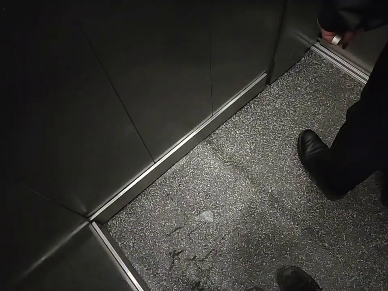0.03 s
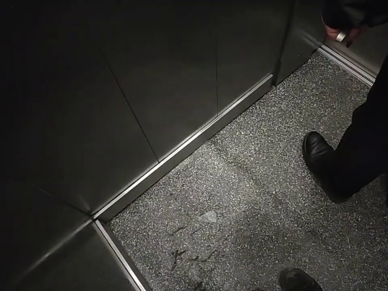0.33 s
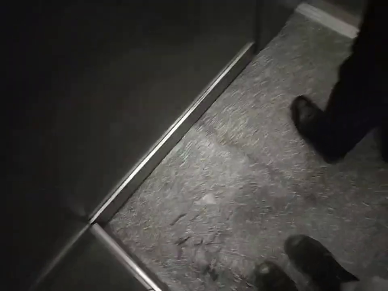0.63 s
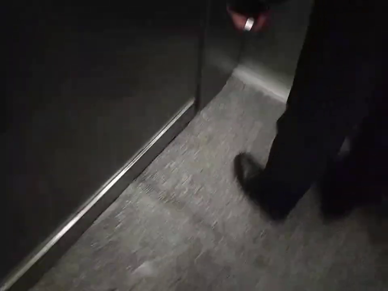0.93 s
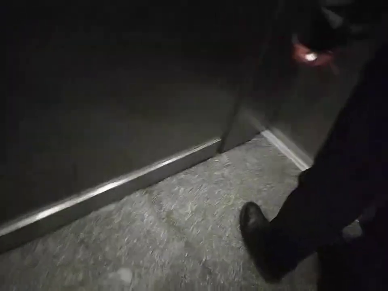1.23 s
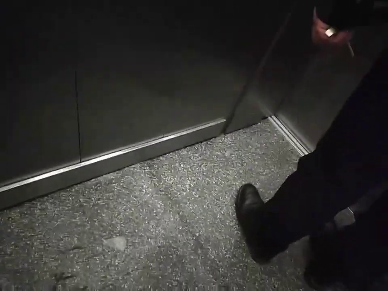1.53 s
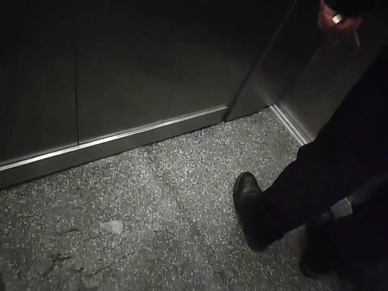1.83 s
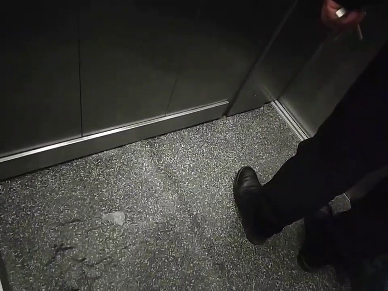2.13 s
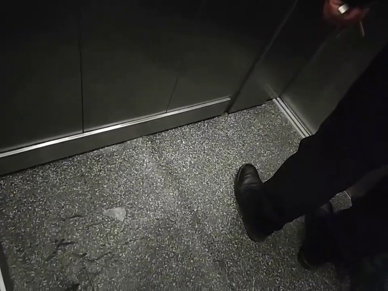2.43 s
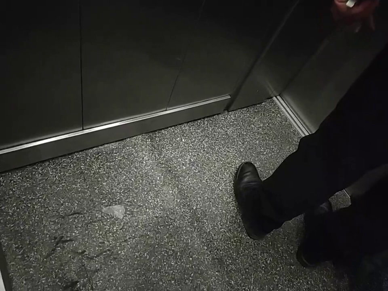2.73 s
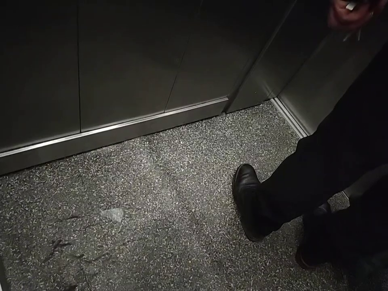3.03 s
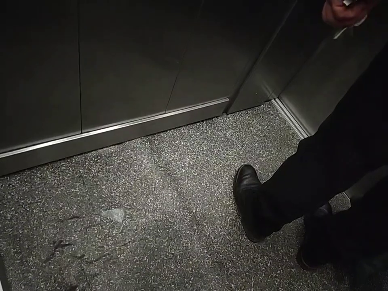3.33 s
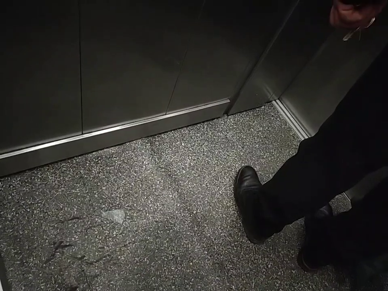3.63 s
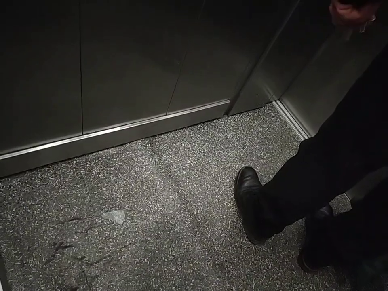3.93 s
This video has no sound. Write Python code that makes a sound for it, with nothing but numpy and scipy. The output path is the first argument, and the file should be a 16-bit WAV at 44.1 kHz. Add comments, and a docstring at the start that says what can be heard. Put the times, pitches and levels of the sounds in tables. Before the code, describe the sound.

Shoes shuffle and thud in a metal elevator, with a latch clack and clicking keys.

```python
"""Shuffling in a metal lift cabin

Shoes thud and scuff on the hollow floor, and each blow excites the cabin's modes into a boom.
Friction gives gritty scrapes and the rustle of clothes. A latch clacks and a metal fitting,
knocked twice, rings in damped free vibration. Keys click in a hand over a low rumble and faint hiss."""
import sys
import numpy as np
from scipy import signal
from scipy.fft import rfft, irfft
from scipy.io import wavfile
from scipy.ndimage import map_coordinates

SR = 44100
rng = np.random.default_rng(int(sys.argv[2]) if len(sys.argv) > 2 else 0)


def to_wav(sig):
    """Store sig (one row per channel, or 1-D mono) as 16-bit WAV at the path in sys.argv[1].

    Samples outside -1..1 are clipped; the rate is SR.
    """
    pcm = np.clip(np.atleast_2d(sig), -1, 1) * 32767
    pcm = np.round(pcm).astype(np.int16)
    wavfile.write(sys.argv[1], SR, pcm.T)  # frames by channels


N = 176400
T = np.arange(N) / SR
LN_1000 = np.log(1000)  # amplitude falls a thousandfold, or 60 dB, in one t60

# Course of the rumble and of the rustle. Each row: time in seconds, level in dB.
RUMBLE_LEVELS = [(0, -44), (.35, -45.5), (.85, -45.5), (1.2, -53.5), (1.6, -48), (2.0, -51), (2.5, -51),
                 (3.1, -59), (3.5, -58.5), (4, -61)]
RUSTLE_LEVELS = [(0, -59), (.09, -51), (.19, -45.5), (.28, -51), (.38, -49.5), (.58, -53), (.75, -51.5),
                 (.95, -55.5), (1.18, -56), (1.55, -60.5), (1.92, -60.5), (2.22, -73), (2.5, -65),
                 (2.66, -75), (2.77, -67), (2.92, -73.5), (3.03, -66), (3.35, -74), (3.48, -65),
                 (3.76, -73.5), (4, -66.5)]
# Footfalls. Each row: start and rise in seconds, relative levels of cabin boom, floor knock and
# sole scuff in dB, frequency favoured by that spot of the floor in Hz.
STEPS = [(0.0, 0.0026, -47, -40.5, -48.5, 325), (0.041, 0.038, -41.5, -58, -54, 170),
         (0.156, 0.016, -49, -38.5, -45, 476), (0.184, 0.0059, -30, -35.5, -64, 189),
         (0.316, .014, -39.5, -70, -75, 160), (.469, 0.016, -68, -46.5, -55, 240),
         (0.537, 0.0063, -55, -42.5, -60, 320), (0.596, 0.024, -40, -50, -55, 158),
         (0.636, .0035, -38.5, -37, -51, 300), (.735, .015, -38, -45.5, -54.5, 163),
         (0.804, 0.0049, -37, -40, -49, 166), (0.851, .008, -34.5, -58, -75, 278.6),
         (1.224, 0.073, -46.5, -47, -57, 229), (1.333, 0.024, -48, -45, -68, 240),
         (1.422, 0.024, -38.5, -47, -55.5, 238), (1.455, 0.006, -39, -44.5, -53, 175),
         (1.525, 0.014, -34, -39.5, -47.5, 415), (1.563, .006, -42, -40.5, -46, 460),
         (1.598, 0.0092, -36, -38.5, -63, 246), (1.669, .003, -35, -44.5, -43.5, 550),
         (1.801, 0.06, -38.5, -44.5, -56, 244), (1.889, 0.032, -37, -42.5, -52.5, 215),
         (2.296, 0.0098, -40.5, -42.5, -52.5, 252), (2.368, .012, -41, -43.5, -54, 380),
         (3.421, 0.072, -53, -58.5, -92, 161), (3.56, 0.066, -51, -59.5, -95, 145.5)]
# Modes of the cabin and its wall panels. Each row: frequency in Hz, gain in dB, t60 in seconds.
CABIN_MODES = [(101, -24.5, 1.7), (144.4, -22, 1.7), (166.1, -10, 0.83), (205.3, -16, .25),
               (237, -16, 0.84), (323.7, -18.5, 0.83), (409.4, -19.5, 0.28), (561, -29, 1.15),
               (1688, -40.5, 1.7)]
# Key contacts. Each row: start and rise in seconds, relative level and pan in dB, resonance in Hz.
KEY_CLICKS = [(0.609, 0.0012, -50, -13, 8540), (2.766, 0.00065, -51, -5, 11200),
              (3.018, 0.00031, -52.5, -4, 9800), (3.2683, 0.00049, -40, -3, 10940),
              (3.287, 0.0016, -39, -6, 11240), (3.3485, 0.00066, -46.5, -2, 11600),
              (3.419, 0.0026, -53.5, -6, 9400), (3.641, 0.032, -53.5, -4, 8660),
              (3.884, 0.00087, -44, -3, 8250), (3.919, 0.00084, -36.5, -5, 8200),
              (3.929, 0.0093, -42, 1, 9300)]
# Scrapes. Each row: start, rise and t60 in seconds, then hiss level, body level, hiss pan and
# lift of the sheen above about 12 kHz, all in dB.
SCRAPES = [(0.783, 0.012, .19, -34, -50.5, -5.5, -2), (.845, 0.017, 0.14, -39, -51, -13, 17),
           (1.213, .03, 0.33, -55.5, -53, -10.5, -4), (1.331, 0.011, 0.25, -48, -55, 15, 6),
           (1.383, .035, 0.31, -45.5, -60, -3.5, 10), (1.662, 0.013, 0.23, -40, -44.5, -2, -14),
           (2.36, 0.0083, 0.24, -53.5, -50.5, -15, -17)]
# Modes of the door latch. Each row: frequency in Hz, level in dB.
LATCH_MODES = [(590, -33), (1350, -37), (2020, -40), (3120, -48), (3640, -46), (4980, -44.5), (6850, -38)]
# Knocks on the fitting. Each row: start and rise in seconds, relative level and pan in dB.
FITTING_KNOCKS = [(1.664, .008, -39, -10.5), (2.364, 0.019, -49, -7)]
# Its modes. Each row: frequency in Hz, t60 in seconds, gains at the first and second knock in dB.
FITTING_MODES = [(4050, 0.26, -14, -13), (4400, 0.24, -11, -17), (4850, 0.15, -7, 5.5),
                 (5900, 0.76, -20, -21), (6854, 0.37, 3.5, -3.5), (7400, 0.17, -1, -8),
                 (8060, 0.21, 1, 1.5), (8444, .12, 14.5, -5), (9076, 0.11, 4, -13), (9570, 0.16, 1.5, -14),
                 (10300, .2, -7, -15), (10780, 0.16, -7, -18), (12300, 0.14, -15, -24)]
# Dry ticks. Each row: start in seconds, level in dB.
TICKS = [(2.122, -53), (2.853, -56.5)]
# Spectra of the noises. Each row: frequency in Hz, relative spectral density in dB.
RUMBLE_SPECTRUM = [(15, -18), (28, -8), (39, 5), (50, -3.5), (70, -3.5), (102, -8.5), (140, -16.5),
                   (300, -28), (1000, -77)]
AIR_SPECTRUM = [(71, -40), (120, 5.5), (323, 3), (514, -8.5), (1560, -18.5), (2340, -20.5), (6690, -31),
                (10000, -37), (15000, -54)]
FLOOR_SPECTRUM = [(90, -10.5), (170, 7.5), (215, 2.5), (272, 0), (325, 1.5), (378, -5), (480, -8),
                  (545, -8.5), (680, -15.5), (850, -20.5), (2000, -65)]
SCUFF_SPECTRUM = [(250, -3), (520, 3.5), (850, 6), (1100, -1), (1520, -6.5), (1690, -8.5), (1850, -10),
                  (2050, -7.5), (3200, -18.5), (6000, -29), (15000, -82)]
CLOTH_SPECTRUM = [(300, 7), (800, 2), (1500, -1.5), (3500, -4.5), (5300, -4), (7000, -1.5), (8700, 4.5),
                  (10200, 5.5), (12000, -6), (15500, -19)]
KEY_SPECTRUM = [(1000, -19.5), (3000, -17.5), (4500, -9.5), (6000, -0.5), (6700, -7.5), (8200, 0),
                (10000, 1.5), (11200, 1), (12200, -7.5), (15500, -14)]
SCRAPE_BODY_SPECTRUM = [(300, -43), (580, -8), (1250, -0.5), (1520, -7.5), (1620, -4), (1690, 9.5),
                        (1780, -4.5), (2120, -2), (2400, -5), (2720, 0), (2880, -6.5), (3500, -13.5),
                        (5000, -13), (9000, -80)]
SCRAPE_HISS_SPECTRUM = [(2000, -6), (4000, -6.5), (5400, -5.5), (6600, 4.5), (8000, 3.5), (9700, 5.5),
                        (10700, 0.5)]
SCRAPE_SHEEN_SPECTRUM = [(11800, -15), (15500, -30)]
TICK_SPECTRUM = [(300, 14), (1000, 15), (3000, -4), (5000, 3), (8000, -1), (15000, -15)]


def amp(db):
    """Amplitude ratio of a level in decibels."""
    return 10 ** (np.asarray(db) / 20)


def unit_rms(x):
    """Normalisation to unit mean power."""
    return x / np.sqrt(np.mean(x ** 2))


def pan(db):
    """Constant-power gains for a level difference, left minus right."""
    return unit_rms(amp(np.array([[db], [-db]]) / 2))


def noise(spectrum, coherence=0., grain_db=0., scatter_db=0., ring_hz=0.):
    """Coloured stereo noise, coherent only in the bass: higher up, each side hears other reflections."""
    grain = amp(grain_db * np.repeat(rng.standard_normal(N // 30 + 1), 30)[:N])
    white = rng.standard_normal((3, N)) * grain
    f = np.fft.rfftfreq(N, 1 / SR) + 1
    shared = coherence / (1 + (f / 644) ** 4)
    mixed = np.sqrt(shared) * rfft(white[2]) + np.sqrt(1 - shared) * rfft(white[:2])
    hz, db = np.array(spectrum, float).T
    chance_resonances = np.interp(f, 109 * np.arange(512), rng.standard_normal(512))
    shape_db = np.interp(np.log(f), np.log(hz), db) + scatter_db * chance_resonances
    if ring_hz:
        shape_db += 10.5 / (1 + ((f - ring_hz) / 287) ** 2)  # one definite resonance
    low_cut = 1 / np.sqrt(1 + (.5 * hz[0] / f) ** 4)
    return unit_rms(irfft(mixed * amp(shape_db) * low_cut, N))


def swell(start, rise, t60):
    """Envelope of a damped response: linear rise, exponential decay."""
    age = T - start
    return np.clip(age / rise, 0, 1) * np.exp(-LN_1000 * np.maximum(age - rise, 0) / t60)


def ring(start, rise, modes, chatter_t60=0.092, contacts_per_s=400):
    """Struck modes are modulated at random while the parts chatter, then decay freely."""
    age = T - start
    live = (age > 0) & (age < 1)
    out, t = np.zeros((2, N)), age[live]
    roughness = 5.4 * np.exp(-LN_1000 * t / chatter_t60)
    for hz, db, t60 in modes:
        contacts = rng.standard_normal((2, 1024)) + 1j * rng.standard_normal((2, 1024))
        chatter = np.array([np.interp(t * contacts_per_s, np.arange(1024), c) for c in contacts])
        tone = np.exp((2j * np.pi * hz - LN_1000 / t60) * t)
        rough_tone = np.imag(tone * (1 + roughness * chatter / np.sqrt(2)))
        out[:, live] += amp(db) * rough_tone / np.hypot(1, roughness)
    return out * np.clip(age / rise, 0, 1)


def walls(x, wet_db, t60):
    """Reverberation: dense reflections between close metal walls follow the direct sound."""
    t = T[:SR // 2]
    tail = rng.standard_normal((2, len(t))) * np.exp(-LN_1000 * t / t60) * (t > .003)
    tail /= np.sqrt(np.sum(tail ** 2, axis=1, keepdims=True))
    return x + amp(wet_db) * signal.fftconvolve(x, tail, axes=1)[:, :N]


def background():
    """Ambient noise: the cabin's low rumble varies in level under the steady hiss of the air."""
    level_db = np.interp(T, *np.array(RUMBLE_LEVELS).T)
    rumble = amp(level_db) * noise(RUMBLE_SPECTRUM, coherence=0.97) * pan(4.7)
    return rumble + amp(-66) * noise(AIR_SPECTRUM, coherence=0.69) * pan(8.2)


def cabin_boom(push_s=0.0056, favour_db=14, favour_octaves=.29, wander_hz=4.07):
    """Modal excitation: each mode stores energy from a footfall according to where the shoe lands."""
    boom = 0
    for hz, mode_db, t60 in CABIN_MODES:
        power = np.zeros(N)
        for start, _, blow_db, _, _, favoured_hz in STEPS:
            lift_db = favour_db * np.exp(-(np.log2(hz / favoured_hz) / favour_octaves) ** 2)
            power[int(start * SR):int((start + push_s) * SR)] += amp(blow_db + lift_db) ** 2
        energy = signal.lfilter([1], [1, -np.exp(-2 * LN_1000 / (t60 * SR))], power / (push_s * SR))
        # A random drift stands for the wavering pitch of overlapping blows.
        drift = wander_hz * np.interp(T, np.linspace(0, 4, 60), rng.standard_normal(60))
        phase = 2 * np.pi * np.cumsum(hz + drift) / SR
        boom += amp(mode_db) * np.sqrt(energy) * np.sin(phase)
    return boom * pan(4.5)


def floor_knocks():
    """Impact gives the floor panel a quick thump and a slower decay; successive blows add in energy."""
    energy = 0
    for start, rise, _, db, _, _ in STEPS:
        thump = amp(-4.5) * swell(start, rise, t60=0.27)
        energy += (amp(db) * (thump + swell(start, rise, t60=0.82))) ** 2
    return amp(-3) * np.sqrt(energy) * noise(FLOOR_SPECTRUM, coherence=0.81) * pan(3.5)


def sole_scuffs():
    """Sliding friction between sole and floor gives a burst of grainy noise at each step."""
    energy = sum((amp(db) * swell(start, rise, t60=0.29)) ** 2 for start, rise, _, _, db, _ in STEPS)
    friction = noise(SCUFF_SPECTRUM, coherence=0.078, grain_db=4.5, scatter_db=2.5)
    return amp(2.5) * walls(np.sqrt(energy) * friction, wet_db=-6, t60=0.4) * pan(6)


def cloth_rustle(slips_per_s=44, flutter_db=0.47, patch_db=3.5, patch_hz=494):
    """Stick-slip friction of fabric: every slip has a level and a colour of its own."""
    flutter = flutter_db * np.interp(T * slips_per_s, np.arange(256), rng.standard_normal(256))
    friction = noise(CLOTH_SPECTRUM, coherence=0.052, grain_db=2.5)
    f, t, bands = signal.stft(friction, SR, nperseg=256)
    grid = np.meshgrid(f / patch_hz, t * slips_per_s, indexing="ij")
    patches = map_coordinates(rng.standard_normal((128, 256)), grid, order=1, mode="mirror")
    rub = signal.istft(bands * amp(patch_db * patches), SR)[1][:, :N]
    level_db = np.interp(T, *np.array(RUSTLE_LEVELS).T)
    return amp(level_db + flutter) * unit_rms(rub)


def cloth_crackle(catches_per_s=19, t60=0.022):
    """Fabric catches and lets go as a Poisson process, each release a tiny bright tick."""
    catches = (rng.random(N) < catches_per_s / SR) * rng.random(N)
    envelope = signal.lfilter([1], [1, -np.exp(-LN_1000 / (t60 * SR))], catches)
    return amp(-63) * envelope * noise(CLOTH_SPECTRUM)


def keys():
    """Each impact of key on key gives a sharp snap and excites resonances of its own."""
    clicks = 0
    for start, rise, db, pan_db, hz in KEY_CLICKS:
        snap = amp(-2) * swell(start, rise, t60=0.0076)
        envelope = snap + swell(start, rise, t60=0.14)
        metal = noise(KEY_SPECTRUM, grain_db=3, scatter_db=7.5, ring_hz=hz)
        clicks += amp(db) * pan(pan_db) * envelope * metal
    return amp(-5) * walls(clicks, wet_db=-6, t60=0.11)


def scrapes():
    """Brief friction gives a bright hiss over a coarser body coloured by wall-panel resonances."""
    body = noise(SCRAPE_BODY_SPECTRUM, coherence=0.19, grain_db=1.5)
    out = 0
    for start, rise, t60, hiss_db, body_db, pan_db, sheen_db in SCRAPES:
        sheen = [(hz, db + sheen_db) for hz, db in SCRAPE_SHEEN_SPECTRUM]
        hiss = noise(SCRAPE_HISS_SPECTRUM + sheen, scatter_db=5) * pan(pan_db)
        out += swell(start, rise, t60) * (amp(hiss_db) * hiss + amp(body_db) * body)
    return walls(out, wet_db=-26, t60=0.4)


def latch(t60=0.1):
    """The door latch drops, and heavy damping cuts its modes short to a clack."""
    return ring(start=.791, rise=.004, modes=[(hz, db, t60) for hz, db in LATCH_MODES])


def fitting():
    """Free vibration of a metal fitting: the point of impact decides how strongly each mode rings."""
    out = 0
    for k, (start, rise, db, pan_db) in enumerate(FITTING_KNOCKS):
        modes = [(hz, gains_db[k], t60) for hz, t60, *gains_db in FITTING_MODES]
        out += amp(db) * pan(pan_db) * ring(start, rise, modes)
    return walls(out, wet_db=-27, t60=0.19)


def dry_ticks():
    """Two broadband transients on the left decay too quickly to have a pitch."""
    envelope = sum(amp(db) * swell(start, rise=0.00084, t60=0.019) for start, db in TICKS)
    return envelope * noise(TICK_SPECTRUM, coherence=0.78) * pan(18)


def scene():
    """Superposition: the pressures of all sources in the cabin add."""
    footfalls = cabin_boom() + floor_knocks() + sole_scuffs()
    contacts = scrapes() + latch() + fitting() + keys() + dry_ticks()
    return footfalls + contacts + cloth_rustle() + cloth_crackle() + background()


def record(dry, cutoff_hz=15750):
    """Band limiting: a steep elliptic low-pass filter removes the highest treble."""
    return signal.sosfilt(signal.ellip(10, .2, 80, cutoff_hz, fs=SR, output="sos"), dry)


dry = scene()
out = record(dry)
to_wav(out)
```